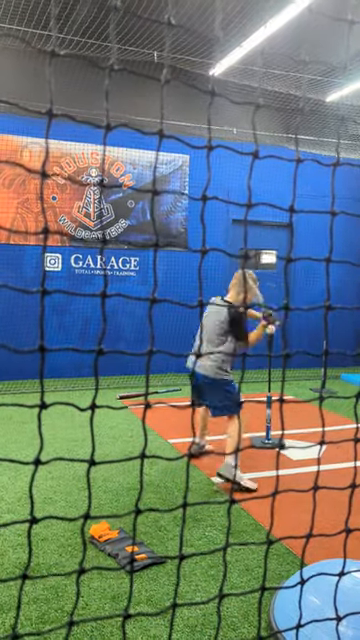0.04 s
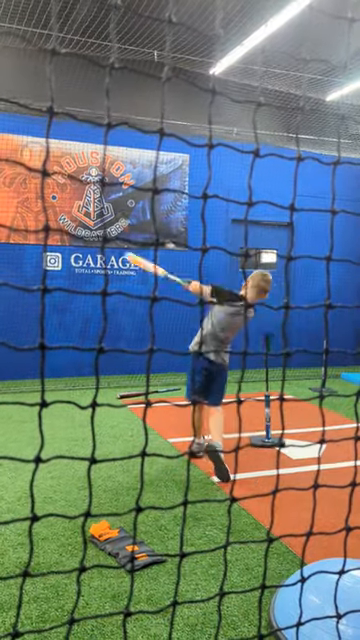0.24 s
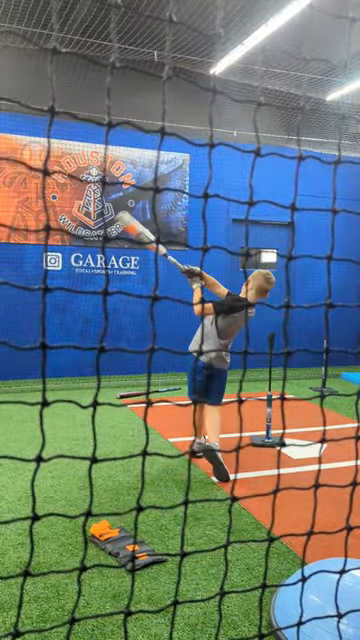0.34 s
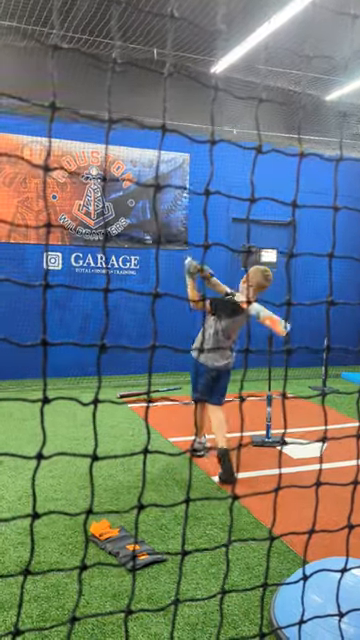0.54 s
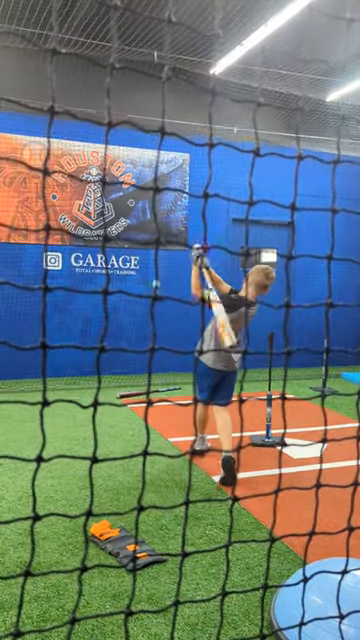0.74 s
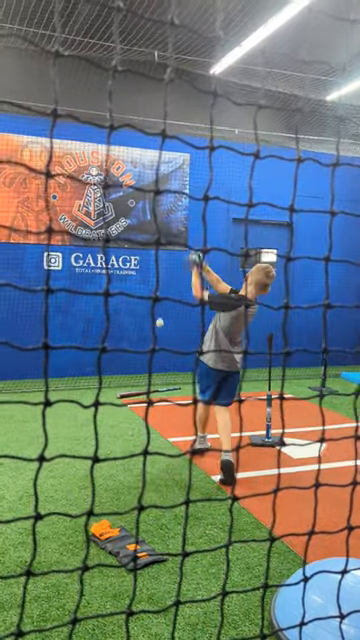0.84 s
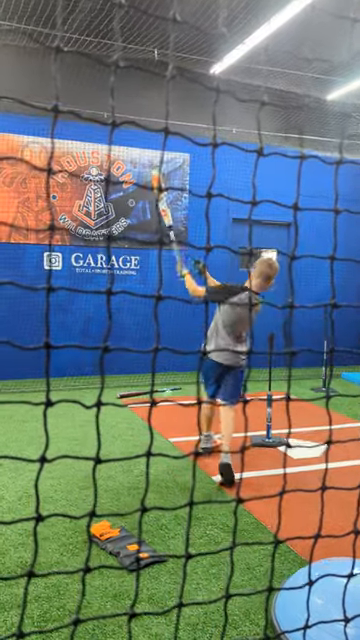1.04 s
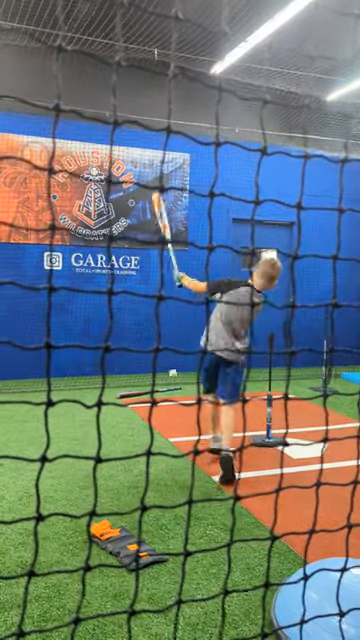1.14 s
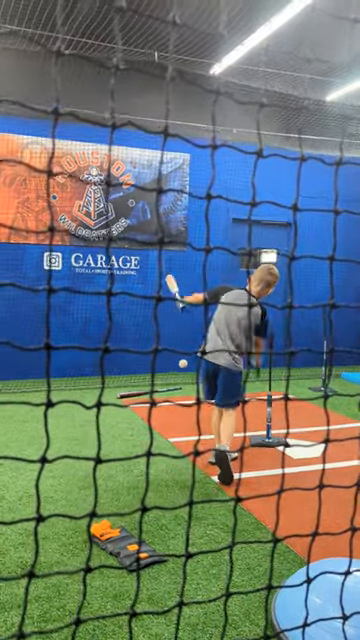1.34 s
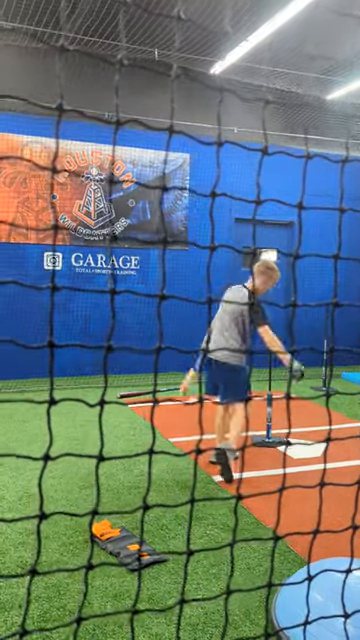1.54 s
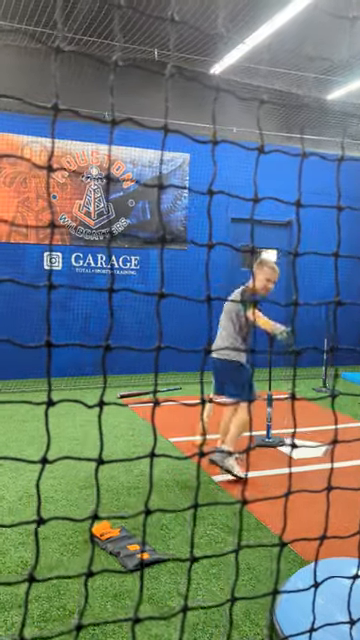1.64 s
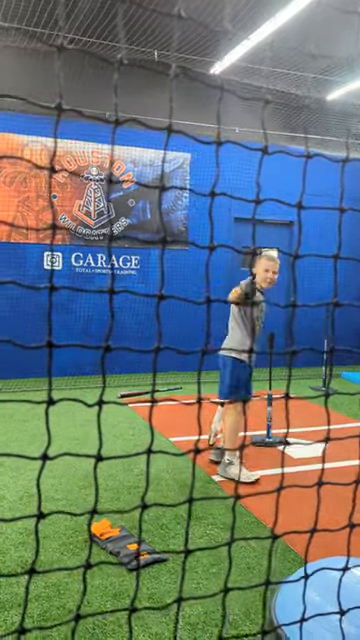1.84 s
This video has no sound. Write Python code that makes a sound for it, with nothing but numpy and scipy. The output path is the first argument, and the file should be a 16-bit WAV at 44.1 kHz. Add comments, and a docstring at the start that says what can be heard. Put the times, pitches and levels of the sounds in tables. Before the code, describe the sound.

A bat strikes a ball at about 0.2 seconds with a loud, sharp crack that echoes through an indoor batting cage. A bright swish of netting follows at once, blending into the decay. Near 1.1 seconds the ball lands with a dull, slightly booming thud. A soft footstep on turf and a light clack come around 1.7 seconds. Faint clothing rustles, ticks and a low ventilation hum lie underneath.

```python
"""A bat cracks a ball off a tee in an indoor batting cage, a few metres from a phone.
The bat's barrel rings briefly, the floor and walls throw the crack back and the hall echoes on.
The ball swishes into the net, then thuds on padding and turf, which makes the room boom.
The batter steps back, clothes rustle, shoes and netting tick; ventilation hums throughout."""
import sys
import numpy as np
from scipy import signal
from scipy.fft import rfft, irfft
from scipy.io import wavfile
from scipy.ndimage import uniform_filter1d

SR = 44100
rng = np.random.default_rng(int(sys.argv[2]) if len(sys.argv) > 2 else 0)


def digitize_waveform(pressure):
    """Quantize a signal to 16-bit integers and store it at the path in sys.argv[1].

    Rows of a 2-D input are taken as channels; values are limited to [-1, 1].
    """
    field = np.atleast_2d(pressure).T
    bounded = np.clip(field, -1, 1)
    quanta = np.round(bounded * 32767).astype(np.int16)
    wavfile.write(sys.argv[1], SR, quanta)


N = 83790
T = np.arange(N) / SR
FREQ = np.maximum(np.fft.rfftfreq(2 * N, 1 / SR), 1)
HALL_BUILD_S = 0.0086  # time the room's echo takes to build up
ALIKE_HZ = 716  # below this both microphones hear much the same room sound

# The bright tone of the snap, early echoes and net. Each row: frequency in Hz, relative level in dB.
BRIGHT_TONE = [(300, -36.5), (2000, 5), (4500, 13), (7000, 15.5), (9000, 11.5), (15000, -37)]
# The tone of something scraping the turf. Each row: frequency in Hz, relative level in dB.
SCUFF_TONE = [(200, 14), (700, 9), (1200, -2), (2500, -6), (4500, -5), (8500, 0), (11000, -14),
              (16000, -26)]
# The tone of rubbing cloth and shoes. Each row: frequency in Hz, relative level in dB.
RUSTLE_TONE = [(200, -8.5), (900, 0.5), (2200, 3.5), (4000, -4.5), (7000, 3), (9000, 2.5), (11000, -10.5),
               (16000, -23)]


def bat_hit(start_s=0.2131):
    """The bat meets the ball: a hard snap, a short crack and a ringing barrel, then the echoes."""
    # How barrel and ball ring. Each row: pitch in Hz, relative level in dB, fade time in seconds.
    bat_modes = [(494, -5.5, 0.019), (749, -11.5, 0.055), (2210, 1.5, 0.0087), (2545, -7, 0.015),
                 (2960, -15, .018), (4660, -11.5, 0.014), (5900, -17, .015), (7400, -18.5, 0.023)]
    # The tone of the crack. Each row: frequency in Hz, relative level in dB.
    crack_tone = [(200, -3), (1000, -39.5), (2200, -4.5), (5000, -9.5), (8500, -3), (11000, -17.5),
                  (16000, -23.5)]
    crack = undb(-9.5) * noise(crack_tone) * fade(0.011)
    snap = noise(BRIGHT_TONE) * fade(0.0016)
    barrel = undb(-6) * ring(bat_modes)
    blow = cut(barrel + crack + snap, 362, "high")  # the thin barrel gives off little bass
    return delay(blow + echoes(blow) + crack_tail(), start_s)


def echoes(blow):
    """The floor throws the blow back at once; walls and ceiling return it later and smeared."""
    # The floor echo's delay in seconds: left microphone, then right.
    floor_lags = (.00205, .0025)
    # Wall and ceiling echoes. Each row: delay in seconds, level in dB, left over right in dB.
    wall_echoes = [(.0085, -16, 11.5), (.0135, -17.5, 7.5), (.019, -12, -5), (.027, -12, 2.5),
                   (.0435, -13, -4), (.058, -12, 4.5), (.0625, -10, 0), (.102, -15, -6),
                   (.1435, -17.5, -6.5), (.1855, -24.5, -13)]
    out = undb(-1.5) * np.array([delay(ear, lag) for ear, lag in zip(blow, floor_lags)])
    for lag, db, pan_db in wall_echoes:
        scatter = rng.standard_normal((2, N)) * fade(0.012)
        scatter /= np.linalg.norm(scatter, axis=1, keepdims=True)
        smear = shape(blow, rfft(scatter, 2 * N))
        out += delay(blow + undb(-3) * smear, lag) * undb(db) * pan(pan_db)
    return out


def crack_tail(flutter_db=2.5):
    """Bright echoes off the cage frame and the duller hall fade unevenly; faint notes linger."""
    # The tone of the crack in the hall. Each row: frequency in Hz, relative level in dB.
    hall_tone = [(70, -12), (135, -2.5), (240, -3), (320, 0.5), (410, 0.5), (520, -8.5), (760, 3.5),
                 (1130, -6), (1450, 2), (1900, -2.5), (3500, -7), (4400, -5.5), (5300, -9.5), (8500, -7),
                 (11000, -15), (16000, -28)]
    # Notes ringing on in the cage. Each row: pitch in Hz, level in dB, fade time in seconds.
    cage_modes = [(415, -27.5, 0.43), (602, -26, 0.51), (734, -28, .45), (829, -29.5, 0.42),
                  (1010, -35.5, 0.51), (1500, -22, 0.25), (2283, -37, 1), (3070, -35.5, 0.8)]
    early = undb(-15.5) * noise(BRIGHT_TONE) * swell(HALL_BUILD_S) * fade(0.22)
    flutter = undb(flutter_db * wander(250))
    late = undb(-13.5) * hall(hall_tone)
    return flutter * (early + late) + room_ring(cage_modes)


def net_swish(start_s=0.335):
    """The ball drags the netting with a bright swish that carries on in the hall."""
    swish = noise(BRIGHT_TONE) * swell(0.003) * fade(0.17)
    room = undb(-10.5) * hall(BRIGHT_TONE)
    return delay(undb(-18.5) * (swish + room), start_s)


def ball_thuds():
    """The ball lands on padding and turf: two dull blows with a slight scuff set the room booming."""
    # The blows. Each row: start in seconds, level in dB, pitch multiplier, scuff level in dB.
    blows = [(1.070, -20, 1.2, -40), (1.083, -11, 0.98, -68)]
    # The room's low notes. Each row: pitch in Hz, relative level in dB, fade time in seconds.
    boom_modes = [(155.3, -20.5, 0.34), (201.6, -9, 0.3), (269.4, -6, 0.25), (404, -23.5, 0.35)]
    # The tone of a thud in the hall. Each row: frequency in Hz, relative level in dB.
    tail_tone = [(70, -19), (160, -0.5), (260, -1), (340, -9.5), (450, -13), (750, -27.5), (1200, -40),
                 (4000, -57)]
    out = 0
    for start, db, pitch, scuff_db in blows:
        body = knock(pitch) + room_ring(boom_modes) + undb(-19) * hall(tail_tone)
        scuff = noise(SCUFF_TONE) * fade(0.19)
        scuff += undb(-7) * delay(hall(SCUFF_TONE), 0.003)
        out += delay(undb(scuff_db) * scuff - undb(db) * body, start)
    return out


def knock(pitch):
    """A soft blow makes a small body ring dully; pitch multiplies all its frequencies."""
    # The notes of a thud. Each row: pitch in Hz, relative level in dB, fade time in seconds.
    thud_modes = [(180.8, -1, 0.086), (232, -17.5, 0.044), (408, -11, 0.026), (667, -21, 0.064)]
    dull = cut(ring(thud_modes, pitch), 695 * pitch, "low")  # soft contact dulls the treble
    return cut(dull, 115 * pitch, "high", order=1)  # a small body gives off little deep bass


def footstep():
    """A crisp heel lands, then the slower sole: each knocks, crunches the turf and stirs the room."""
    # Heel, then sole. Each row: start in seconds, level in dB, pitch multiplier,
    # crunch level in dB, relative room level in dB, crunch rise time in seconds.
    contacts = [(1.695, -25, 1.8, -34, -13, 0.0017), (1.7074, -23.5, 1.036, -31.5, -3.5, 0.0039)]
    # The tone of a step in the hall. Each row: frequency in Hz, relative level in dB.
    tail_tone = [(70, 11), (140, 20), (250, 18.5), (380, 18.5), (520, 2.5), (720, 4), (1000, -7),
                 (1400, -1), (2400, -3), (3300, -7.5), (4500, -4), (7000, -0.5), (9000, -2), (11000, -13),
                 (16000, -20)]
    # Low room notes the sole sets off. Each row: pitch in Hz, level in dB, fade time in seconds.
    boom_modes = [(175.6, -37, 0.24), (270.4, -40, .5), (338, -37, .25), (419, -45, .33)]
    out = 0
    for start, db, pitch, crunch_db, room_db, rise in contacts:
        body = knock(pitch) + undb(room_db - 5.5) * hall(tail_tone)
        crunch = noise(SCUFF_TONE) * T / rise * np.exp(1 - T / rise)
        out += delay(undb(crunch_db) * crunch - undb(db) * body, start)
    sole_start = contacts[-1][0]
    return out + delay(room_ring(boom_modes), sole_start)


def clack(start_s=1.738):
    """One light clack rings just after the step."""
    # Its two notes. Each row: pitch in Hz, relative level in dB, fade time in seconds.
    clack_modes = [(2310, -6, 0.11), (2530, -2, 0.069)]
    return delay(undb(-42.5) * ring(clack_modes), start_s)


def ticks(rise_s=0.0014):
    """Shoes and netting give faint, dry ticks, each a tiny burst of noise."""
    # Each row: start in seconds, level in dB, fade time in seconds, treble lift in dB per octave.
    bursts = [(.829, -46.5, 0.036, -1), (.99, -51.5, 0.12, 6), (1.219, -49, 0.077, 5),
              (1.43, -55, 0.029, 2)]
    out = 0
    for start, db, fade_s, tilt_db in bursts:
        tick = noise(RUSTLE_TONE, tilt_db) * swell(rise_s) * fade(fade_s)
        out += delay(undb(db) * tick, start)
    return out


def rustles(grain_db=2.0):
    """Cloth and shoes rub in grainy swells as the batter moves."""
    # Each row: peak time in seconds, level in dB, rise and fall in seconds, treble lift in dB per octave.
    moves = [(0.058, -54.5, 0.15, 0.1, -0.5), (0.144, -47, 0.032, 0.08, 0.5), (.92, -59.5, 0.46, 0.41, -1),
             (1.255, -54, 0.063, 0.15, -3.5), (1.57, -62, 0.032, 0.061, 5.5), (1.647, -53, 0.031, 0.071, 2),
             (1.84, -54.5, 0.062, 0.2, -3.5)]
    out = 0
    for peak, db, rise, fall, tilt_db in moves:
        width = np.where(T < peak, rise, fall)
        motion = np.exp(-((T - peak) / width) ** 2)
        out += undb(db + grain_db * wander(200)) * motion * noise(RUSTLE_TONE, tilt_db)
    return out


def ventilation(wobble_db=2.66, drift_hz=0.6):
    """The ventilation gives a slightly wavering low hum over the rush of moving air."""
    # The notes of the hum. Each row: pitch in Hz, level in dB.
    hum_notes = [(57.5, -41.5), (114.1, -49)]
    # The tone of the moving air. Each row: frequency in Hz, relative level in dB.
    air_tone = [(25, -20), (45, -10), (70, -3), (130, -7), (240, -8.5), (340, -17.5), (500, -26),
                (800, -30), (2000, -37), (4000, -47), (8000, -39.5), (11000, -50.5), (16000, -52.5)]
    hum = 0
    for hz, db in hum_notes:
        level = undb(db + wobble_db * wander(6.75))
        phase = 2 * np.pi * np.cumsum(hz + drift_hz * wander(5.7)) / SR
        hum += level * np.sqrt(2) * np.sin(phase)
    return hum + undb(-52.5) * noise(air_tone)


def hall(tone):
    """Countless echoes blur into a wash that builds up, then dies at its own rate in each band."""
    # How long the hall rings. Each row: frequency in Hz, fade time in seconds.
    fade_times = [(120, 1), (400, 0.61), (1000, 0.66), (2500, 0.81), (5000, 0.77), (9000, 0.67),
                  (13000, 0.6)]
    band_hz, band_s = np.array(fade_times).T
    wash = noise(tone)
    bands = [np.interp(np.log(FREQ), np.log(band_hz), row) for row in np.eye(len(band_hz))]
    tail = sum(shape(wash, band) * fade(fade_s) for band, fade_s in zip(bands, band_s))
    return tail * swell(HALL_BUILD_S)


def room_ring(modes, spread=0.79):
    """The room's own notes swell after a blow; high ones reach the two microphones out of step."""
    out = 0
    for hz, db, fade_s in modes:
        phase = spread * rng.standard_normal((2, 1)) * hz / ALIKE_HZ
        out += undb(db) * fade(fade_s) * np.sin(2 * np.pi * hz * T + phase)
    return out * swell(HALL_BUILD_S)


def ring(modes, pitch=1):
    """A struck object sounds all its own notes (its modes) at once, and each fades away."""
    return sum(undb(db) * fade(fade_s) * np.sin(2 * np.pi * hz * pitch * T) for hz, db, fade_s in modes)


def noise(tone, tilt_db=0):
    """Stereo noise with the given tone and an average (rms) level of 1, alike in both ears in the bass."""
    common, side = rng.standard_normal((2, N))
    side = shape(side, FREQ / np.hypot(FREQ, ALIKE_HZ))
    gain = undb(tone_curve(tone) + tilt_db * np.log2(FREQ))
    both = shape(np.array([common + side, common - side]), gain)
    return both / np.sqrt(np.mean(both ** 2))


def wander(rate):
    """A smooth random wobble of size about 1 that takes a new value rate times a second."""
    hold = int(SR / rate)
    stairs = np.repeat(rng.standard_normal(N // hold + 1), hold)
    return 0.93 * uniform_filter1d(uniform_filter1d(stairs, hold), hold)[:N]


def fade(fade_s):
    """Die away by 60 dB every fade_s seconds: this is the fade time in the tables."""
    return np.exp(-np.log(1000) * T / fade_s)


def swell(rise_s):
    """Rise smoothly from silence in about rise_s seconds."""
    return 1 - np.exp(-(T / rise_s) ** 2)


def delay(x, seconds):
    """Start a sound later."""
    gap = int(seconds * SR)
    return np.concatenate([np.zeros(x.shape[:-1] + (gap,)), x[..., :N - gap]], axis=-1)


def undb(db):
    """Turn decibels into a multiplier."""
    return 10 ** (np.asarray(db) / 20)


def pan(db):
    """Left and right multipliers that make the left db decibels louder."""
    return undb(np.array([[db], [-db]]) / 2)


def tone_curve(tone):
    """Join a tone table's points into a level in dB for every frequency."""
    hz, db = np.array(tone).T
    return np.interp(np.log(FREQ), np.log(hz), db)


def shape(x, gain):
    """Turn each frequency up or down by its own multiplier."""
    return irfft(rfft(x, 2 * N) * gain)[..., :N]


def cut(x, hz, keep, order=2):
    """Keep the "high" or the "low" side of hz and weaken the other."""
    return signal.sosfilt(signal.butter(order, hz, keep, fs=SR, output="sos"), x)


def scene():
    """Everything heard in the cage, added together."""
    ball = bat_hit() + net_swish() + ball_thuds()
    return ball + footstep() + clack() + ticks() + rustles() + ventilation()


def record(dry):
    """The phone's microphone openings colour the sound; it rounds the highest peaks and cuts the top."""
    # Small resonances of the openings. Each row: frequency in Hz, width in Hz, boost in dB.
    ports = [(4350, 450, 5), (6490, 460, 2.5), (8030, 300, -1.5), (8830, 300, 2.5), (12200, 600, 3.5)]
    # The shading of the left microphone. Each row: frequency in Hz, level change in dB.
    left_shade = [(100, 1.5), (2000, 1), (3200, 0.5), (5000, -10), (8200, -13), (10500, -1), (13000, 2.5),
                  (15900, -5)]
    peak_limit, top_hz = 0.76, 15800
    ports_db = sum(db * np.exp(-((FREQ - hz) / width) ** 2) for hz, width, db in ports)
    left_db = ports_db + tone_curve(left_shade)
    coloured = shape(dry, undb([left_db, ports_db]))
    rounded = coloured / (1 + (coloured / peak_limit) ** 4) ** .25
    return signal.sosfilt(signal.ellip(8, .2, 80, top_hz, fs=SR, output="sos"), rounded)


dry = scene()
out = record(dry)
digitize_waveform(out)
```